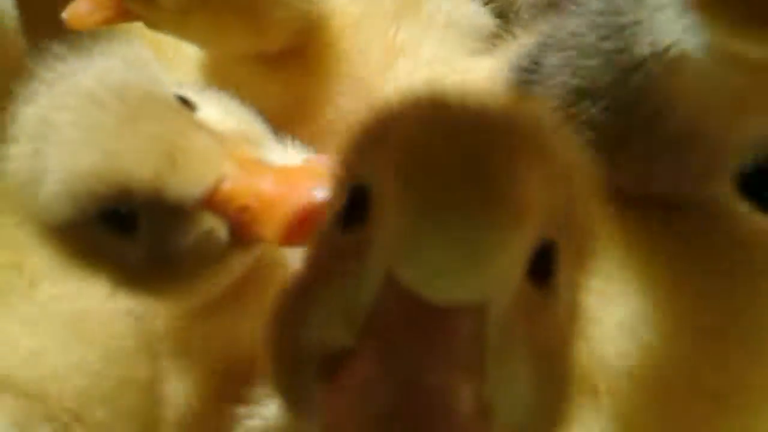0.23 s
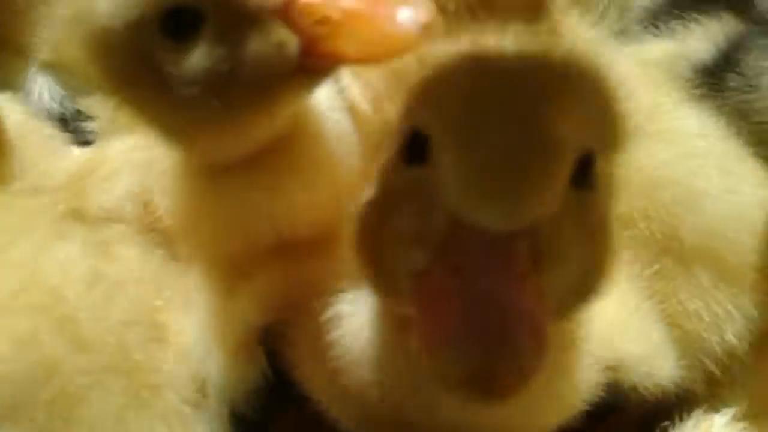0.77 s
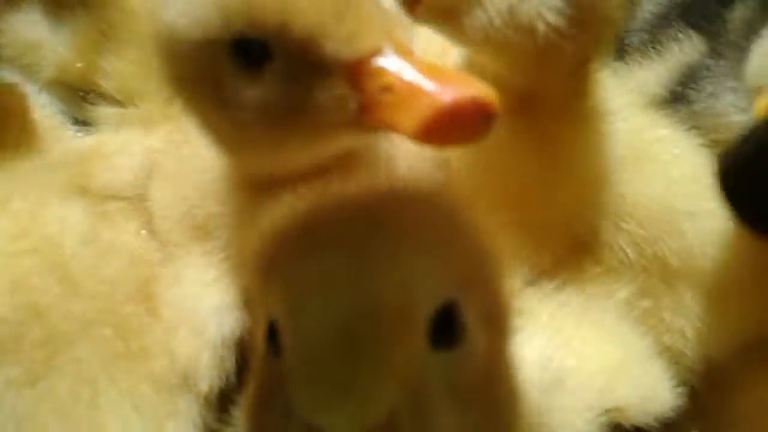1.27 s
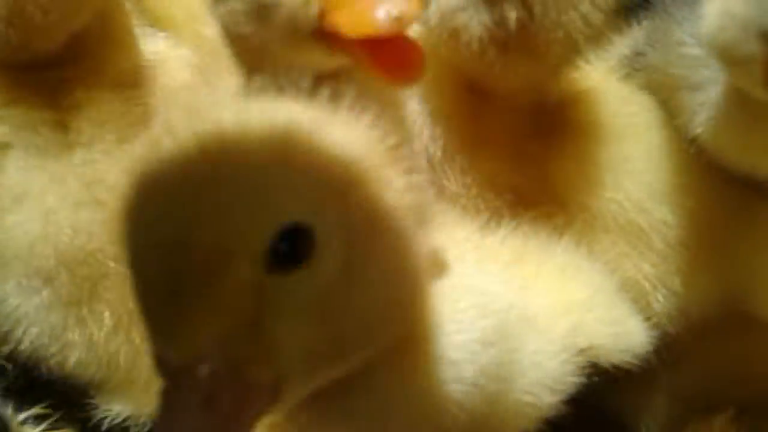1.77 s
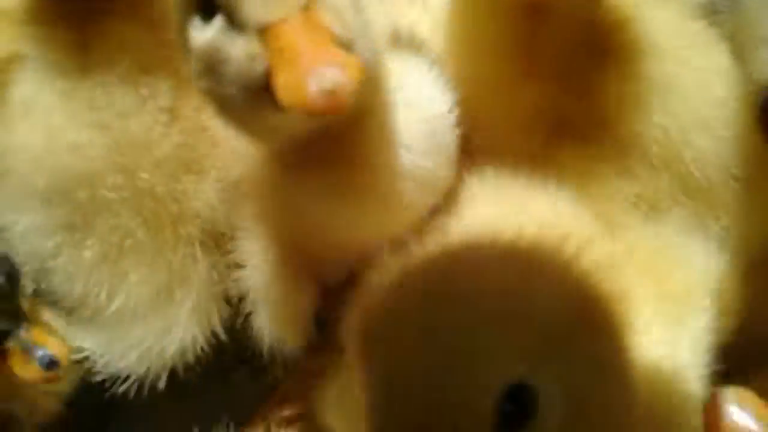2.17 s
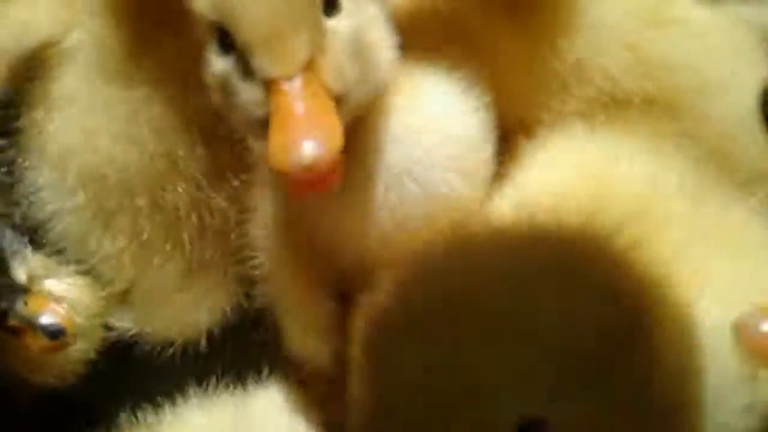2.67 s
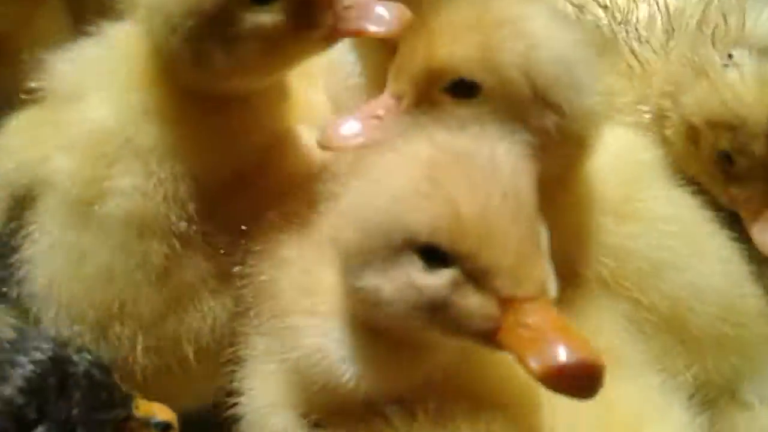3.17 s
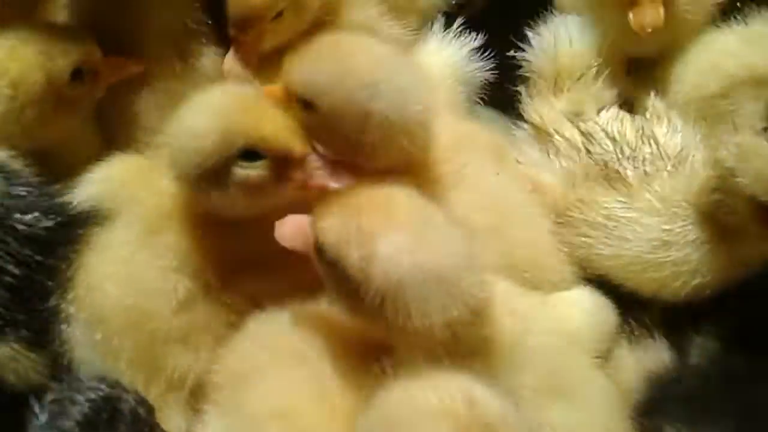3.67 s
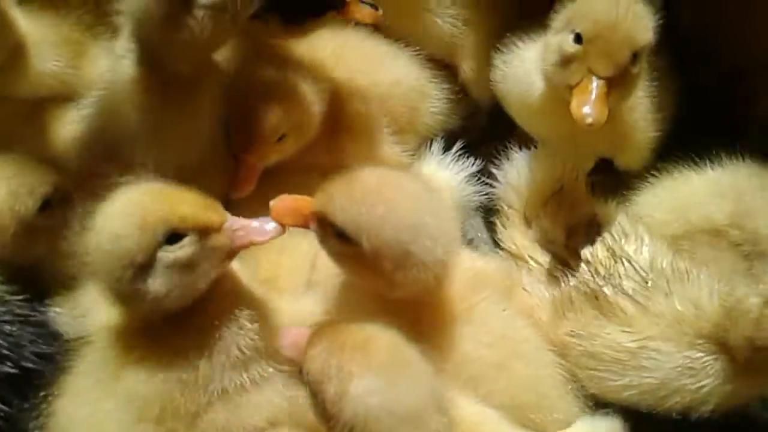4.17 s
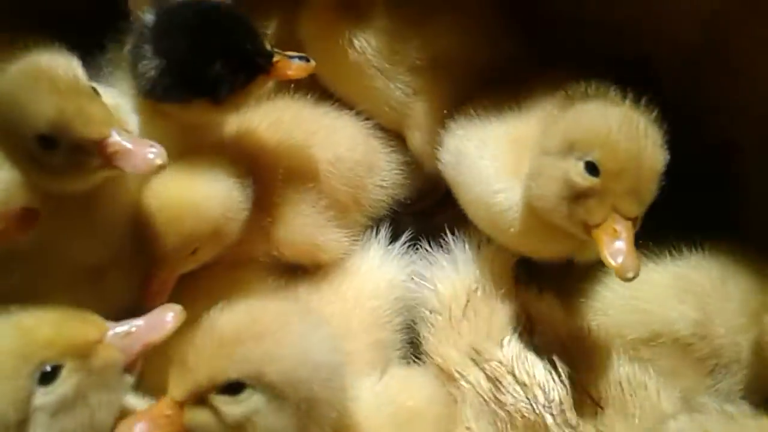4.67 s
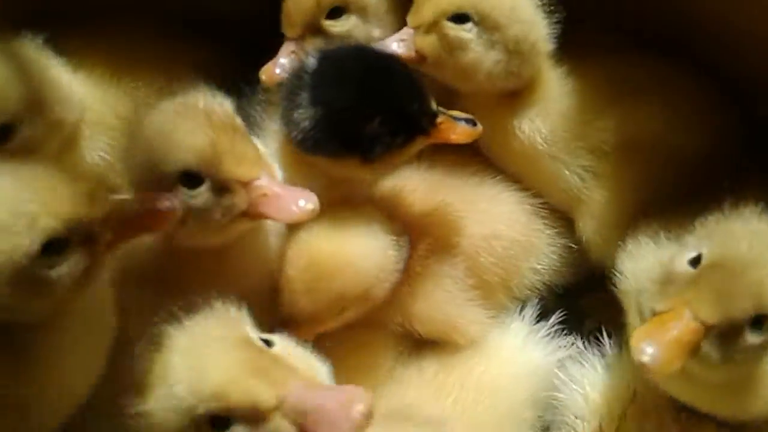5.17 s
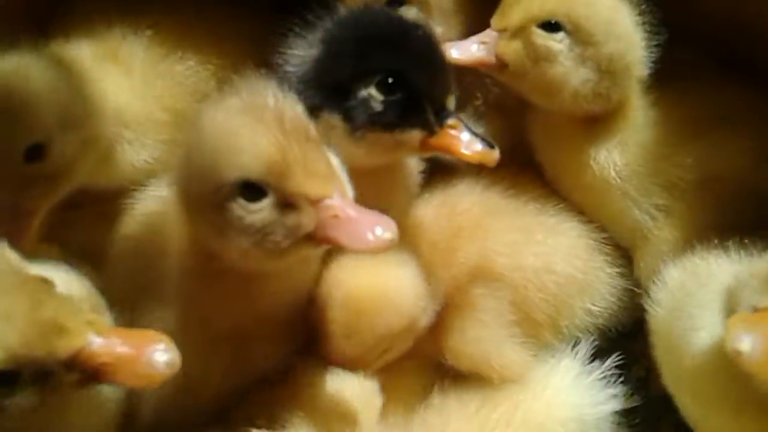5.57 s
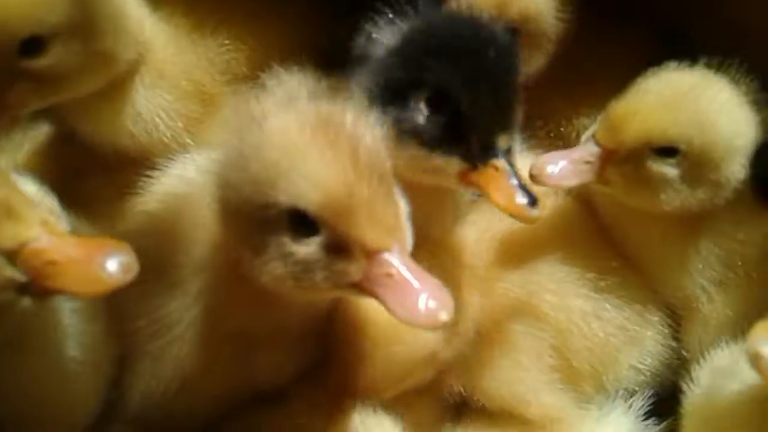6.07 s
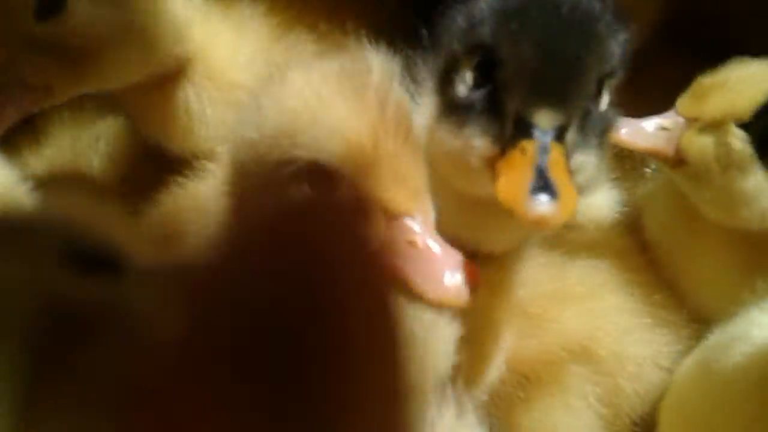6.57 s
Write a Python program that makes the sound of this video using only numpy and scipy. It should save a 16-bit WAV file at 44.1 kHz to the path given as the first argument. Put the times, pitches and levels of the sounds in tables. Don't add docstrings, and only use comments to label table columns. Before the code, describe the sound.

Day-old ducklings in a cardboard box: steady piercing arched peeps close by, fainter cheeps behind, soft foot taps, then only shuffling and knocks.

```python
import sys
import numpy as np
from scipy import signal
from scipy.fft import rfft, irfft
from scipy.io import wavfile
from scipy.ndimage import uniform_filter1d

SR = 44100
rng = np.random.default_rng(int(sys.argv[2]) if len(sys.argv) > 2 else 0)


def master(y):
    cut = np.clip(np.atleast_2d(y).T, -1, 1)
    pcm = np.round(cut * 32767)
    wavfile.write(sys.argv[1], SR, pcm.astype(np.int16))


def boost_factor(decibels):
    exponent = np.asarray(decibels, float) / 20
    return 10 ** exponent


N = 300741

# (time [s], chip level [dB], leap level [dB], 2nd overtone [dB], 3rd overtone [dB])
NEAR_PEEPS = [(.004, -40, -53, -53, -75), (.626, -49, -62, -50.5, -58), (.905, -47.5, -66, -61.5, -67),
              (1.321, -45, -72, -61.5, -61), (1.697, -42.5, -56, -59.5, -61), (1.946, -60, -52, -58.5, -63),
              (2.245, -44.5, -52, -57.5, -63), (2.542, -44.5, -52, -57.5, -58.5),
              (2.806, -51, -50.5, -56.5, -57.5), (3.128, -41.5, -57, -57, -58),
              (3.426, -36.5, -63, -56, -61), (3.732, -36, -64, -55, -54.5), (4.028, -40, -64, -51.5, -52.5),
              (4.329, -40, -65, -50.5, -55.5), (4.641, -46, -56, -52.5, -54.5)]
# (time [s], pitch [Hz], level [dB])
EARLY_WHISTLES = [
    [(0.03, 3010, -53), (0.048, 3000, -53), (0.062, 2854, -45), (0.078, 2501, -32), (0.092, 2175, -33),
     (0.1, 1870, -42.5), (0.104, 1858, -54)],
    [(0.655, 2945, -62), (0.679, 2897, -59), (0.701, 2583, -40.5), (0.711, 2406, -40), (0.719, 2178, -41),
     (0.727, 1890, -49), (0.73, 1893, -57)],
    [(0.935, 3340, -45), (0.961, 3312, -41.5), (0.971, 3211, -44), (0.981, 3012, -63), (0.997, 2529, -40.5),
     (1.005, 2180, -45.5), (1.01, 2149, -59)],
    [(1.347, 3307, -50), (1.355, 3312, -49), (1.379, 3283, -37), (1.403, 2920, -45.5), (1.415, 2640, -33),
     (1.425, 2200, -42), (1.431, 2070, -56)],
    [(1.724, 3229, -51), (1.732, 3334, -42), (1.756, 3319, -34.5), (1.77, 3150, -39), (1.782, 2960, -45.5),
     (1.798, 2705, -37), (1.81, 2202, -43), (1.813, 2184, -55)],
]
LOUD_WHISTLES = [
    [(1.972, 3705, -42), (1.982, 3650, -32.5), (2.008, 3507, -24.5), (2.026, 3250, -31), (2.042, 2990, -39),
     (2.052, 2700, -35), (2.06, 2190, -41.5), (2.065, 2188, -60)],
    [(2.272, 3540, -39), (2.28, 3670, -34), (2.296, 3617, -26.5), (2.31, 3440, -25), (2.33, 3200, -33),
     (2.35, 2961, -40), (2.358, 2580, -34.5), (2.367, 2130, -43)],
    [(2.568, 3720, -38), (2.586, 3730, -28.5), (2.6, 3570, -24.5), (2.62, 3330, -29), (2.642, 3078, -34),
     (2.65, 2830, -38), (2.66, 2140, -39.5), (2.663, 2180, -52)],
    [(2.834, 3925, -40), (2.856, 3794, -25.5), (2.872, 3570, -24), (2.904, 3142, -34), (2.912, 2945, -40),
     (2.92, 2380, -35), (2.927, 2130, -50)],
    [(3.154, 3580, -42), (3.164, 3780, -34), (3.182, 3565, -24.5), (3.194, 3439, -27), (3.214, 3210, -34),
     (3.234, 2980, -45), (3.244, 2440, -35), (3.251, 2170, -45)],
]
LATE_WHISTLES = [
    [(3.452, 3690, -42), (3.458, 3720, -36), (3.478, 3590, -24), (3.498, 3385, -30), (3.518, 3180, -34.5),
     (3.528, 3020, -42), (3.542, 2230, -32.5), (3.549, 2150, -59)],
    [(3.763, 3875, -48), (3.783, 3770, -30), (3.79, 3650, -27.5), (3.803, 3400, -32), (3.829, 3176, -38.5),
     (3.837, 3180, -49), (3.847, 2610, -37), (3.855, 2129, -39)],
    [(4.066, 3850, -58), (4.08, 3800, -40), (4.096, 3390, -33.5), (4.114, 3250, -39), (4.132, 3110, -47.5),
     (4.14, 2690, -40), (4.146, 2240, -34), (4.15, 2170, -45)],
    [(4.356, 3660, -46), (4.364, 3634, -40.5), (4.384, 3600, -31.5), (4.405, 3300, -34), (4.426, 3041, -38),
     (4.434, 2860, -41), (4.446, 2200, -36), (4.452, 2160, -64)],
    [(4.67, 3776, -46), (4.692, 3639, -28), (4.71, 3350, -32), (4.736, 3138, -41), (4.744, 2942, -41),
     (4.755, 2300, -44)],
]
# (time [s], length [s], start pitch [Hz],
# end pitch [Hz], level [dB])
SECOND_VOICE_SLIDES = [(0.935, 0.0074, 4570, 4040, -43.5), (1.35, .011, 4470, 3860, -45),
                       (1.712, .014, 3530, 3980, -50), (1.728, 0.016, 4250, 3750, -45),
                       (1.974, .015, 4920, 4000, -38.5), (2.274, 0.012, 4790, 4070, -39.5),
                       (2.556, 0.012, 4040, 4840, -50), (2.568, 0.015, 4900, 4020, -39.5),
                       (2.837, .014, 4990, 4190, -37.5), (3.16, 0.012, 4700, 4100, -48),
                       (3.458, 0.009, 4630, 4100, -42), (3.761, .015, 5030, 4280, -40),
                       (4.061, 0.013, 4860, 4270, -34.5), (4.352, 0.015, 4920, 4340, -36),
                       (4.667, 0.014, 4700, 4200, -39), (3.467, .008, 1840, 1870, -44),
                       (3.467, .006, 5250, 5350, -46)]
# (centre [s], half length [s], centre pitch [Hz], level [dB])
RASPS = [(0.65, .008, 4000, -56), (0.66, 0.0016, 4100, -46), (.675, .016, 4500, -50),
         (0.929, .008, 4360, -50), (1.346, .013, 4400, -54), (1.723, .01, 4400, -55),
         (1.973, .008, 4130, -43), (2.263, 0.018, 4300, -48), (2.557, 0.012, 4270, -48),
         (2.83, 0.0074, 4600, -50), (3.154, .014, 4440, -50), (3.451, 0.017, 4500, -47),
         (3.758, 0.018, 4630, -46), (4.061, 0.015, 4600, -43.5), (4.357, 0.019, 4500, -42.5),
         (4.665, 0.023, 4580, -46), (1.041, 0.016, 4090, -47.5), (0.04, .012, 4750, -45),
         (3.772, .008, 4300, -48), (1.56, .04, 4700, -60)]
# (time [s], length [s], pulse rate [Hz], depth [0-1])
CHOKES = [
    (.934, .02, 220, .95),
    (1.039, .011, 230, .8),
    (1.353, .018, 240, .8),
    (1.739, .006, 330, .5),
    (3.168, .01, 300, .4),
    (3.453, .015, 280, .5),
    (4.075, .004, 260, .9),
    (4.358, .012, 260, .5),
]
# (frequency [Hz], level [dB])
BILL_COLOUR = [(3500, -8), (4700, -2), (5600, -2), (6400, 1), (7000, -6), (7600, -8), (8300, -20),
               (9200, -7), (10000, 0), (11500, -7)]
# (time [s], length [s], top pitch [Hz], start level [dB], end level [dB])
FAR_PEEPS = [(1.009, 0.065, 3510, -59, -48.5), (1.268, 0.078, 3560, -50.5, -78),
             (1.498, .066, 3540, -38.5, -78), (1.685, 0.046, 3490, -46, -44), (4.607, 0.06, 3150, -58, -77),
             (4.678, 0.081, 2840, -45, -39.5), (4.753, 0.064, 3760, -54, -43.5),
             (4.829, 0.07, 3200, -52, -48.5), (6.366, 0.05, 2650, -53, -63), (6.55, 0.077, 2920, -53, -100),
             (0.197, 0.049, 5500, -50, -46), (0.029, 0.045, 5100, -64, -53)]
# (level [dB], 2nd overtone [dB], base pitch [Hz])
FAR_CRESTS = [(-51, -56.5, 1700), (-60, -57, 1670), (-56, -41, 1600), (-54, -60, 1600), (-50, -61, 1800),
              (-62, -55, 1900), (-43, -47, 2100), (-47.5, -50.5, 1800), (-61, -53.5, 1800),
              (-66, -52.5, 1850), (-52, -72, 1900), (-47, -73, 2600)]
# (time [s], peak level [dB], panel resonance [Hz], crack level [dB])
TAPS = [(0.223, -37, 590, -28), (0.299, -43.5, 563, -6), (0.331, -31, 467, -14), (0.448, -41.5, 570, -10),
        (0.476, -46.5, 484, -20), (0.881, -52, 576, -8), (1.114, -33, 580, 0.5), (1.937, -40, 586, -4.5),
        (2.14, -37.5, 290, 3), (2.306, -48, 302, 3.5), (2.373, -43.5, 292, -4), (2.45, -43, 305, -21),
        (2.479, -36, 487, -30), (2.83, -40, 276, -17), (3.022, -44, 310, -31), (5.599, -45.5, 436, -27),
        (5.624, -45.5, 570, -4), (5.692, -47, 488, -5), (5.887, -46, 283, -25), (5.903, -47, 266, -29),
        (6.076, -58, 300, 4), (6.101, -45, 300, 1), (6.238, -50, 273, 3.5), (6.281, -42, 280, -23),
        (6.307, -36.5, 415, -5), (6.45, -47, 274, -1), (6.581, -32.5, 665, -10), (6.591, -24.5, 483, -12),
        (6.643, -34.5, 487, -6.5), (6.723, -44, 547, -32), (.332, -38, 220, -30), (6.449, -46, 600, -4),
        (6.611, -46, 520, -20), (6.665, -46, 300, -18)]
# (time [s], peak level [dB], panel resonance [Hz])
STEPS = [(.052, -47, 700), (.115, -48, 600), (1.014, -48, 700), (1.659, -48, 506), (1.806, -48, 277),
         (1.964, -46, 544), (2.066, -50, 272), (2.471, -42, 480), (2.794, -48, 301), (3.341, -47, 288),
         (3.837, -46, 498), (3.964, -50, 498), (4.533, -47, 291), (5.464, -51, 455), (5.747, -49, 482),
         (5.868, -51, 694), (5.982, -52, 401), (6.201, -49, 420), (6.76, -49, 296)]
# (time [s], peak level [dB], pitch [Hz])
CLICKS = [(0.1386, -45, 4830), (0.1715, -51, 4900), (0.794, -50, 2200), (0.794, -51, 4300),
          (0.884, -50, 2100), (0.884, -48, 700), (1.4477, -41, 6300), (2.0263, -41, 3180),
          (2.4678, -38.5, 4750), (2.7571, -53, 4470), (2.9675, -49, 2200), (4.2286, -44, 4400),
          (4.476, -39.5, 2030), (.333, -52, 4840), (0.883, -46, 4600), (1.115, -55, 4700),
          (1.96, -41, 4700), (2.14, -43, 5600), (5.6, -52, 4700), (5.626, -45, 4660), (5.692, -51, 4700),
          (6.583, -27, 4670), (6.593, -32, 4600), (6.583, -38, 1700), (6.593, -42, 6800),
          (6.582, -37, 2860), (6.5913, -28, 1670), (6.644, -42.5, 2700), (1.686, -43, 4700),
          (1.778, -45, 4900), (1.799, -48, 4700), (1.866, -55, 5300), (3.175, -40, 4900), (6.307, -34, 800),
          (6.101, -43, 700), (6.449, -44, 800), (5.891, -48, 550), (5.905, -46, 550), (2.449, -44, 900),
          (6.077, -50, 900), (6.238, -48, 1100), (4.142, -38, 3100), (4.148, -41, 3100), (4.662, -46, 890),
          (3.352, -40, 1430), (3.367, -41, 4700), (0.23, -51, 3400), (1.116, -37.5, 780), (5.6, -44, 850),
          (3.872, -49, 4800), (1.972, -45, 1800), (1.49, -50, 1900)]
# (time [s], length [s], level [dB], centre
# [Hz], bright share [dB])
RUSTLES = [(0.042, 0.15, -59, 600, -10), (0.92, 0.045, -62, 2100, -6), (3.839, 0.18, -58, 553, -11),
           (4.496, 0.13, -57.5, 400, -27), (1.52, 0.059, -62, 1970, 3.5), (2.113, 0.12, -49, 1600, -4),
           (2.14, .07, -53, 600, -20), (2.441, 0.018, -54, 1210, -8), (3.332, 0.12, -49, 1780, -9),
           (3.749, 0.025, -47.5, 1650, -25), (4.028, 0.051, -53.5, 1792, -5), (4.35, 0.019, -48.5, 1600, 4),
           (4.655, 0.03, -51, 1350, -12), (6.222, 0.039, -58, 1410, -1), (6.624, 0.0077, -41, 1800, -11),
           (.21, .03, -58, 4300, -10), (3.15, .035, -55, 2000, -20), (2.135, .07, -51.5, 2960, -5),
           (3.342, 0.062, -71, 2800, -20), (1.656, 0.0082, -63, 4420, 9), (6.538, 0.011, -59, 4500, -1),
           (5.695, .085, -57, 560, -30), (1.12, .045, -54, 800, -14)]
# (time [s], stir level [dB])
STIR = [(0.0, 2), (0.34, 2), (0.61, -4), (1.08, -2), (1.27, -5.5), (1.5, 0), (1.9, 0.6), (2.32, 5),
        (2.89, -1), (3.28, 2), (4.78, 1), (4.98, -3), (5.3, 2), (5.5, -1), (6.82, 1)]
# (time [s], level [dB])
DISTANCE = [(0, -6.5), (3.0, -5), (3.8, 0), (4.1, 2), (4.8, 1.5), (6.82, -8)]
# (frequency [Hz], density [dB per Hz])
AIR_SPECTRUM = [(12, -46), (20, -19), (82, -4), (188, 0), (289, -5), (397, -7), (660, -10.5), (754, -10),
                (817, -11), (1220, -12), (2380, -12), (3100, -19), (4510, -9), (6910, -19), (11800, -21),
                (15300, -75), (22000, -120)]
# (centre [Hz], width [Hz], level [dB])
HUM_BANDS = [
    (66.8, 6.4, -74),
    (108.4, 14.7, -66.5),
]

START_HZ, END_SHARE = 1850, 0.85
CHIP_S, LEAP_S, GAP_S, LEAP_PACE_S = .003, .008, .006, 0.011
HIGH_HZ, SPLIT_WAIT_S = 3500, .01
SLIDE_GAIN_DB, SNAP_DB, SNAP_S = 4.5, 4, 0.0005
DEAD_HZ, DEAD_WIDTH_HZ, DEAD_DB = 2950, 280, -15
BRIGHT_HZ, DULL_DB_PER_OCTAVE = 2540, -55
BREAK_DB, BREAK_SHARE, CREST_SHARE = -70, .72, .52
PUSH_SWINGS, TICK_DB, STEP_CRACK_DB = 0.96, -13, -18
DULL_CLICK_HZ = 1500
CAPSULE_HZ, TOP_HZ = 4700, 11900
AIR_DB, BOX_T60_S, BOX_DB = -57, 0.22, -17.5


def band(x, hz, width_hz):
    return signal.lfilter(*signal.iirpeak(hz, hz / width_hz, fs=SR), x)


def unit(x):
    return x / np.sqrt(np.mean(x ** 2))


def walk(rate_hz, count):
    hold = int(SR / rate_hz)
    levels = np.repeat(rng.standard_normal(count // hold + 1), hold)
    return 1.3 * uniform_filter1d(levels, hold)[:count]


def grains(count, spread_db):
    size = np.minimum(rng.exponential(size=count), 5)
    return rng.standard_normal(count) * boost_factor(spread_db * size)


def add(out, start_s, x):
    i = int(start_s * SR)
    out[i:i + len(x)] += x[:len(out) - i]


def curve(table):
    return np.interp(np.arange(N) / SR, *np.transpose(table))


def colour(table, hz):
    table_hz, table_db = np.transpose(table)
    return np.interp(np.log(hz), np.log(table_hz), table_db)


def ducklings():
    out = second_voice()
    whistles = EARLY_WHISTLES + LOUD_WHISTLES + LATE_WHISTLES
    for (start_s, chip_db, leap_db, second_db, third_db), whistle in zip(NEAR_PEEPS, whistles):
        lock_s, lock_hz, _ = whistle[0]
        joined_s = lock_s + SPLIT_WAIT_S if lock_hz > HIGH_HZ else 0
        shape = near_shape(start_s, chip_db, leap_db, whistle)
        add(out, start_s, peep(shape, second_db, third_db, joined_s=joined_s))
    for row, (crest_db, second_db, base_hz) in zip(FAR_PEEPS, FAR_CRESTS):
        start_s, _, top_hz, _, _ = row
        steady = 2.6 if top_hz > 4500 else .5
        add(out, start_s, peep(far_shape(*row, crest_db, base_hz), second_db, steady=steady, late_db=0,
                               dull_db=DULL_DB_PER_OCTAVE, dead_db=DEAD_DB, attack_s=.004))
    choke = np.zeros(N)
    for start_s, length_s, rate_hz, depth in CHOKES:
        cycle = np.arange(int(length_s * SR)) * rate_hz / SR % 1
        add(choke, start_s, depth * (1.4 * np.sin(np.pi * cycle ** 0.34) ** 3 - 1))
    return out * (1 + uniform_filter1d(choke, int(.0008 * SR)))


def peep(rows, second_db, third_db=-120, steady=0.03, late_db=-22, dull_db=0, dead_db=0, joined_s=0,
         attack_s=.002):
    s, hz, db = np.transpose(rows)
    t = s[0] + np.arange(int((s[-1] - s[0]) * SR)) / SR
    smooth = int(.004 * SR)
    hz = uniform_filter1d(np.interp(t, s, hz), smooth, mode="nearest")
    db = uniform_filter1d(np.interp(t, s, db), smooth, mode="nearest")
    db = db + dead_db * np.exp(-((hz - DEAD_HZ) / DEAD_WIDTH_HZ) ** 2)
    ramp = np.minimum((t - s[0]) / attack_s, (s[-1] - t) / .005)
    edge = np.sin(np.pi / 2 * np.clip(ramp, 0, 1))
    top_s = t[np.argmax(hz > .98 * hz.max())]
    loose = np.maximum(np.clip((top_s - t) / 0.01, 0, 1), steady)
    phase = 2 * np.pi * np.cumsum(hz * (1 + 0.015 * loose * walk(370, len(t)))) / SR
    waver_db = np.minimum(2.6 * loose * walk(210, len(t)), 3)
    out = boost_factor(db + waver_db) * np.sin(phase)

    effort_db = db - db.max()
    loose = np.maximum(loose, np.clip((joined_s - t) / .008, 0, 1))
    second_db = second_db + 0.18 * effort_db + dull_db * abs(np.log2(hz / BRIGHT_HZ)) + late_db * loose
    second_db = second_db + colour(BILL_COLOUR, 2 * hz) + 2.0 * walk(157, len(t))
    third_db = third_db + .8 * effort_db + late_db * loose
    third_db = third_db + colour(BILL_COLOUR, np.maximum(3 * hz, 8300)) + 2 * walk(150, len(t))
    out += boost_factor(second_db) * np.sin(2 * phase) + boost_factor(third_db) * np.sin(3 * phase)
    return np.sqrt(2) * edge * out


def near_shape(start_s, chip_db, leap_db, whistle):
    lock_s, lock_hz, lock_db = whistle[0]
    end_s, end_hz, end_db = whistle[-1]
    lead_s = lock_s - start_s
    t = np.arange(0, lead_s, .001)
    rest = np.exp(-lead_s / LEAP_PACE_S)
    hz = lock_hz - (lock_hz - START_HZ) * (np.exp(-t / LEAP_PACE_S) - rest) / (1 - rest)
    db = np.interp(t, [0, CHIP_S, LEAP_S, lead_s - GAP_S, lead_s],
                   [chip_db, chip_db, leap_db, leap_db, lock_db])
    end = (end_s + 0.0016, END_SHARE * min(end_hz, 2180), max(end_db, -50))
    return np.vstack([np.transpose([start_s + t, hz, db]), whistle[:-1], end])


def far_shape(start_s, length_s, top_hz, head_db, tail_db, crest_db, base_hz):
    u = np.linspace(0, 1 if tail_db > BREAK_DB else BREAK_SHARE, 30)
    bend = 1.5 if length_s < .05 < start_s < 1 else 2
    rise = np.maximum(1 - u / CREST_SHARE, 0)
    fall = np.maximum(u - CREST_SHARE, 0) / (1 - CREST_SHARE)
    hz = top_hz - (top_hz - base_hz) * (rise ** bend + fall ** bend)
    db = np.interp(u, [0, CREST_SHARE, 1], [head_db, crest_db, tail_db])
    return np.transpose([start_s + u * length_s, hz, db])


def second_voice():
    out, t = np.zeros(N), np.arange(int(.006 * SR)) / SR
    for start_s, length_s, from_hz, to_hz, db in SECOND_VOICE_SLIDES:
        u = np.linspace(0, 1, int(length_s * SR))
        hz = (from_hz + (to_hz - from_hz) * u) * (1 + 0.0079 * walk(470, len(u)))
        edge = np.sin(np.pi / 2 * np.minimum(np.minimum(u, 1 - u) / .2, 1))
        level = boost_factor(db + SLIDE_GAIN_DB * (2 * u - 0.5) + 1.5 * walk(470, len(u)))
        add(out, start_s, level * edge * np.sin(2 * np.pi * np.cumsum(hz) / SR))
        if to_hz < from_hz:
            pulse = t / SNAP_S / 2 * np.exp(1 - t / SNAP_S / 2)
            snap = pulse ** 2 * np.sin(2 * np.pi * 1.07 * to_hz * t)
            add(out, start_s + length_s, boost_factor(db + SNAP_DB) * snap)
    for centre_s, half_s, hz, db in RASPS:
        u = np.linspace(0, 1, int(2 * half_s * SR))
        rasp = unit(band(band(band(grains(len(u), 3.5), hz, 900), hz, 900), hz, 1300))
        add(out, centre_s - half_s, boost_factor(db) * np.sin(np.pi * u) * rasp)
    return out


def push(t, rise_s):
    return t / rise_s * np.exp(1 - t / rise_s)


def swing(t, hz):
    return np.sin(2 * np.pi * hz * t)


def taps():
    out, t = np.zeros(N), np.arange(int(.06 * SR)) / SR
    for start_s, db, hz, crack_db in TAPS + [(*step, STEP_CRACK_DB) for step in STEPS]:
        noise = rng.standard_normal((3, len(t)))
        panel = push(t, PUSH_SWINGS / hz) * swing(t, hz)
        panel += 0.048 * push(t, 0.0025) * swing(t, 1.87 * hz)
        panel += 0.79 * push(t, 0.0011) * swing(t, 0.47 * hz)
        panel += 0.34 * unit(band(band(noise[0], 560, 660), 560, 550)) * push(t, 0.0025)
        crack = swing(t, 1590) + 1.24 * swing(t, 1150) + 0.56 * unit(band(noise[1], 1800, 480))
        crack *= boost_factor(crack_db) * push(t, 0.00063)
        tick = swing(t, CAPSULE_HZ) + 0.12 * unit(band(noise[2], 3300, 2300))
        tick *= boost_factor(TICK_DB) * push(t, 0.00048)
        add(out, start_s + 0.00089, boost_factor(db) * (panel + crack + tick))
    for start_s, db, hz in CLICKS:
        scratch = unit(band(rng.standard_normal(len(t)), 3300, 4500))
        click = swing(t, hz) + 0.4 * (hz > DULL_CLICK_HZ) * scratch
        add(out, start_s, boost_factor(db) * push(t, 0.0006) * click)
    return out


def rustles():
    out = np.zeros(N)
    for start_s, length_s, db, hz, bright_db in RUSTLES:
        u = np.linspace(0, 1, int(1.09 * length_s * SR))
        scrape = grains(len(u), 3)
        width_hz = .95 * hz
        body = unit(band(band(band(scrape, hz, width_hz), hz, width_hz), hz, width_hz))
        bright = boost_factor(bright_db) * unit(band(band(scrape, CAPSULE_HZ, 1100), CAPSULE_HZ, 1600))
        add(out, start_s, boost_factor(db) * np.sin(np.pi * u ** .5) * (body + bright))
    return out


def patter():
    hits = rng.random((3, N)) < 110 / SR
    force = np.clip(rng.standard_normal((3, N)), -2, 2)
    kicks = hits * force * boost_factor(3 * walk(3, N) + curve(STIR))
    out = np.zeros(N)
    for kick, hz, width_hz, db in zip(kicks, (290, 520, 1100), (102, 344, 940), (-69.5, -69.5, -75.5)):
        out += boost_factor(db) * unit(band(band(kick, hz, width_hz), hz, width_hz))
    return out


def crowd():
    low_db = curve(STIR)
    high_db = 0.6 * curve(DISTANCE) - 0.031 * low_db + 0.19
    hz = np.maximum(np.arange(N // 2 + 1) * SR / N, 1)
    shape = boost_factor(colour(AIR_SPECTRUM, hz)) * (hz < TOP_HZ)
    out = np.zeros(N)
    for centre_hz in 30 * 2 ** np.arange(0, 9, .5):
        part = np.cos(np.pi * np.clip(np.log2(hz / centre_hz), -.5, .5))
        source = unit(grains(N, 2.66 * (centre_hz < 6000)))
        noise = irfft(rfft(source) * shape * part, N)
        lift_db = low_db * np.exp(-np.log2(centre_hz / 600) ** 2 / 25.0)
        lift_db = lift_db + high_db * np.exp(-np.log2(centre_hz / 4500) ** 2 / 2.0)
        flicker_db = 0.32 * walk(9.2, N) * (centre_hz < 3000) + .5 * walk(2.78, N)
        out += noise * boost_factor(lift_db + flicker_db)
    return boost_factor(AIR_DB) * unit(out)


def hum():
    out = np.zeros(N)
    for hz, width_hz, db in HUM_BANDS:
        out += boost_factor(db) * unit(band(band(rng.standard_normal(N), hz, width_hz), hz, width_hz))
    return out


def box(dry):
    t = np.arange(int(.4 * SR)) / SR
    decay = np.exp(-np.log(1000) * t / BOX_T60_S)
    tail = band(rng.standard_normal(len(t)) * decay * np.clip(t / .012, 0, 1), 4670, 8100)
    wet = signal.fftconvolve(dry * boost_factor(curve(DISTANCE)), tail / np.sqrt(np.sum(tail ** 2)))[:N]
    return boost_factor(BOX_DB) * wet


def scene():
    knocks = signal.lfilter(*signal.butter(2, 7000, fs=SR), taps())
    knocks = signal.sosfilt(signal.butter(2, 90, "high", fs=SR, output="sos"), knocks)
    dry = ducklings() + knocks + rustles() + patter()
    return (dry + box(dry) + crowd() + hum())[None]


def roll_off(x):
    return signal.sosfilt(signal.butter(12, 11940, fs=SR, output="sos"), x)


def record(dry):
    bass = signal.sosfiltfilt(signal.butter(2, 160, fs=SR, output="sos"), dry)
    loudness = np.sqrt(uniform_filter1d(dry ** 2, int(.15 * SR)))
    bass_gain = np.minimum(boost_factor(-52.0) / loudness, 1) ** 0.5
    ducked = dry - bass * (1 - bass_gain)
    mix = signal.sosfilt(signal.ellip(10, .2, 70, TOP_HZ, fs=SR, output="sos"), ducked)
    return roll_off(mix)


dry = scene()
out = record(dry)
master(out)
```